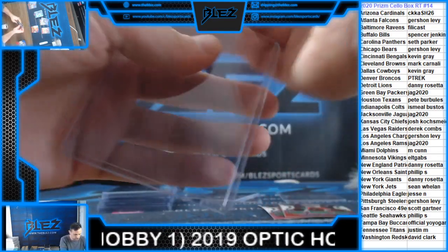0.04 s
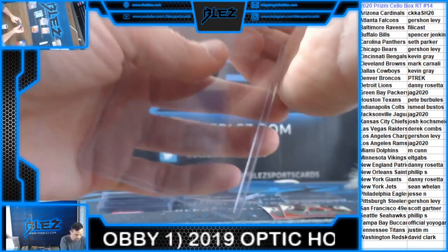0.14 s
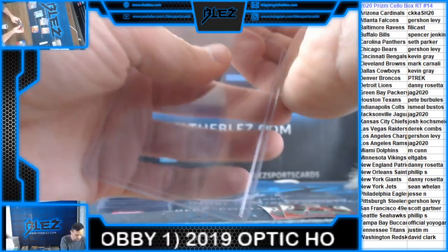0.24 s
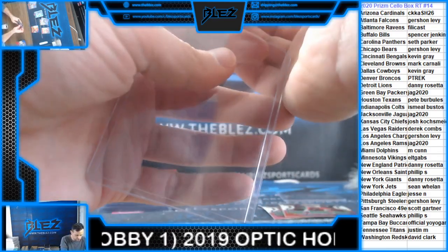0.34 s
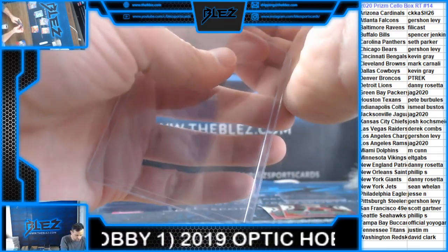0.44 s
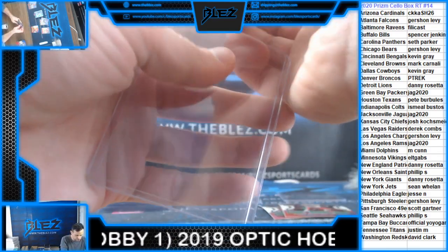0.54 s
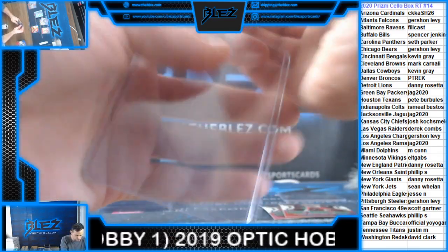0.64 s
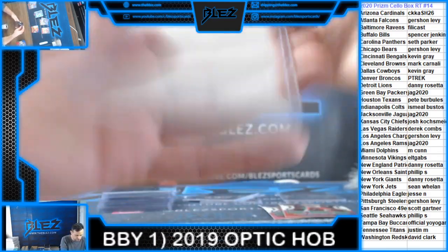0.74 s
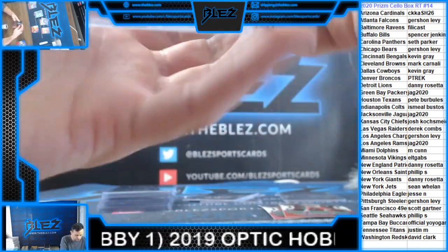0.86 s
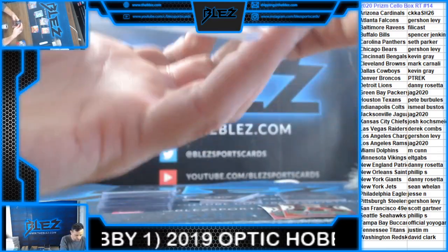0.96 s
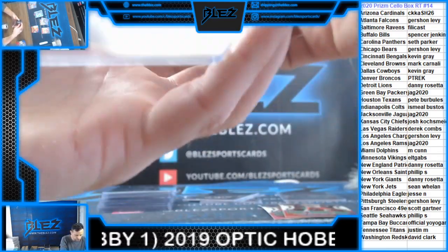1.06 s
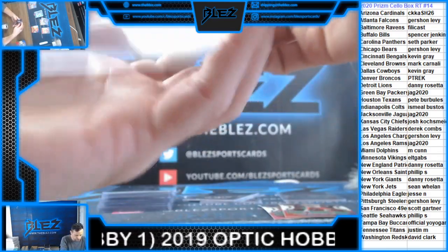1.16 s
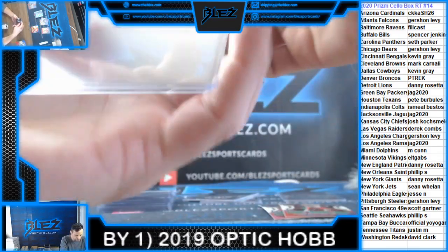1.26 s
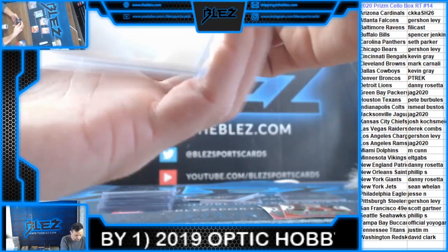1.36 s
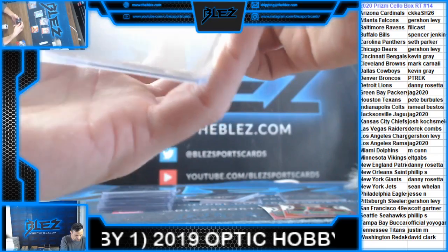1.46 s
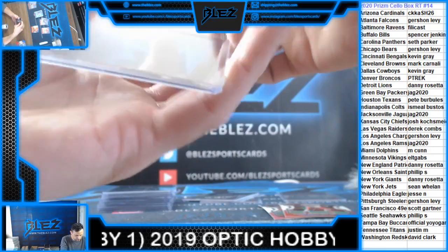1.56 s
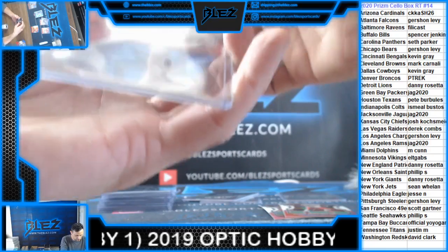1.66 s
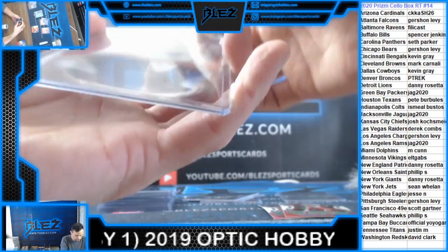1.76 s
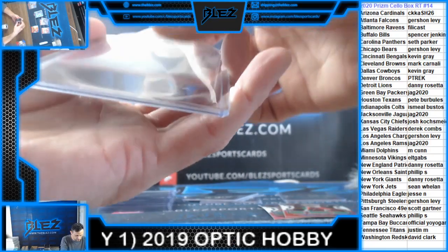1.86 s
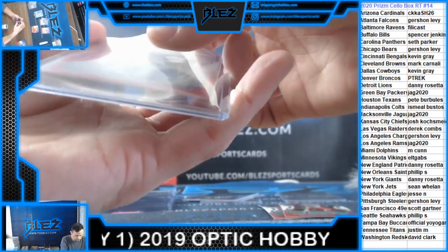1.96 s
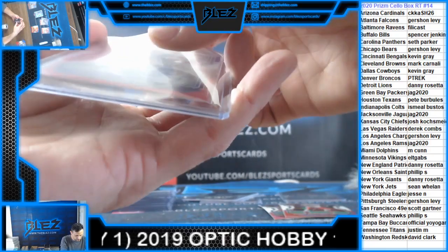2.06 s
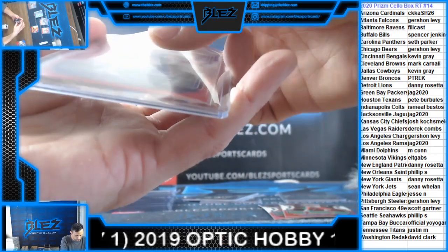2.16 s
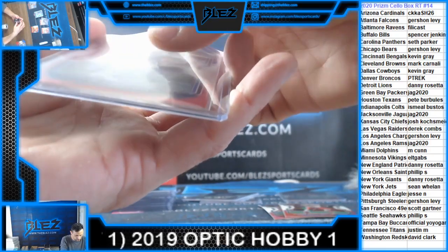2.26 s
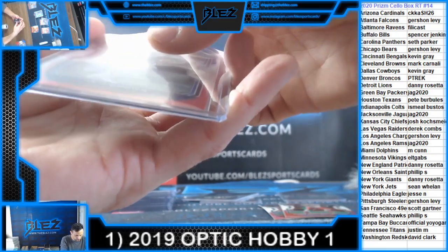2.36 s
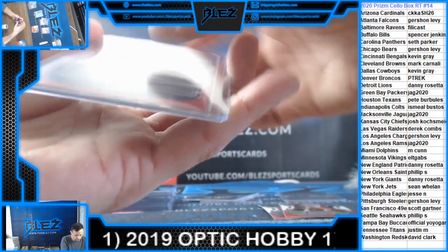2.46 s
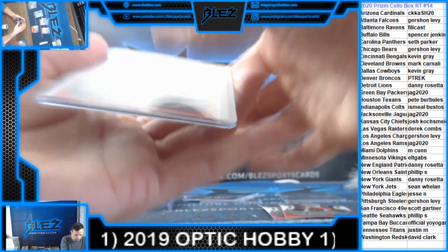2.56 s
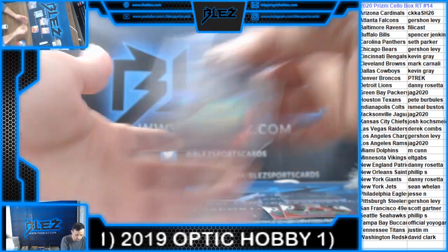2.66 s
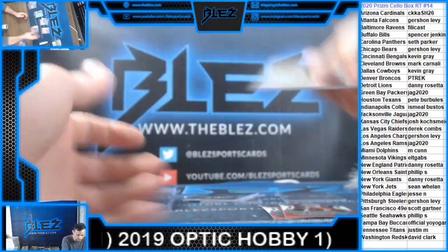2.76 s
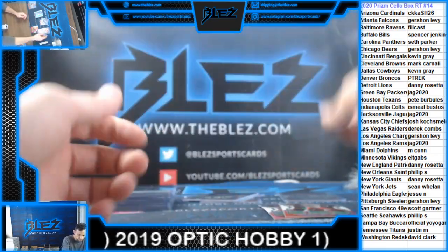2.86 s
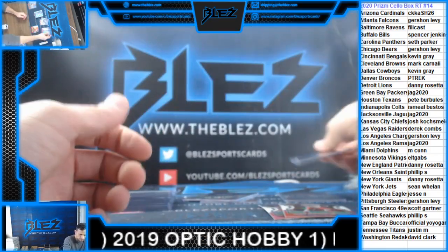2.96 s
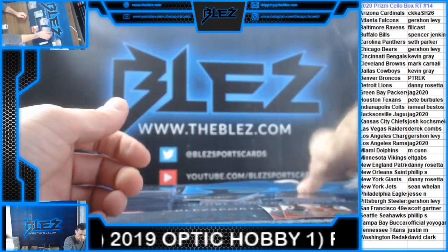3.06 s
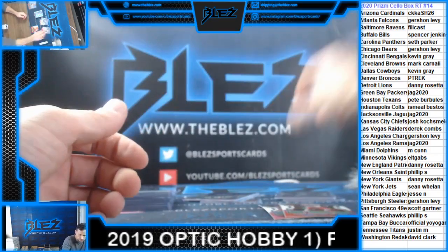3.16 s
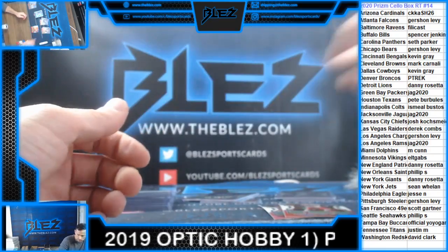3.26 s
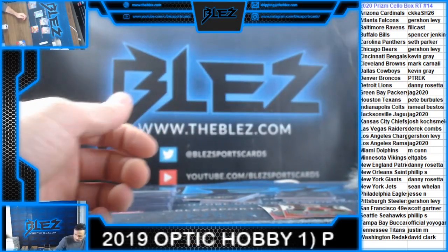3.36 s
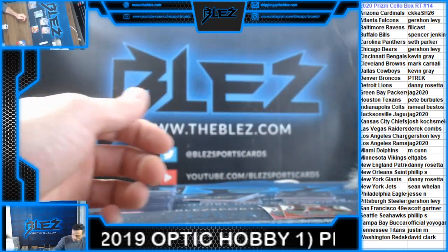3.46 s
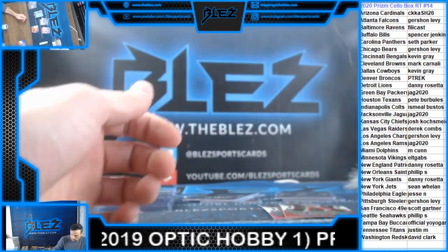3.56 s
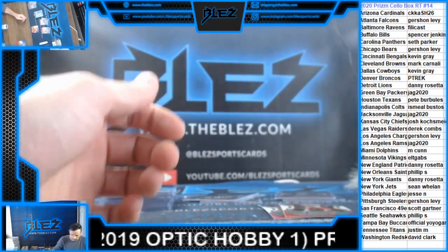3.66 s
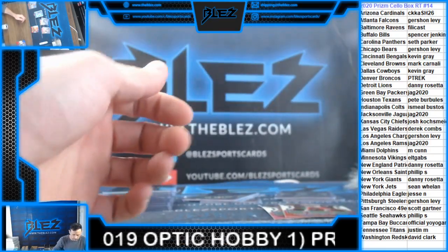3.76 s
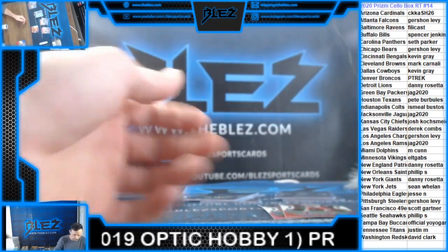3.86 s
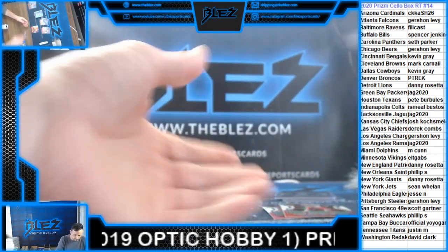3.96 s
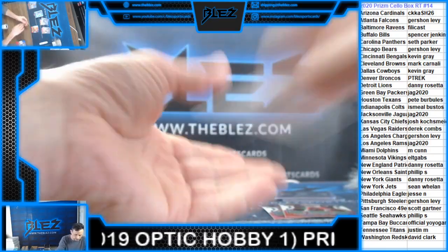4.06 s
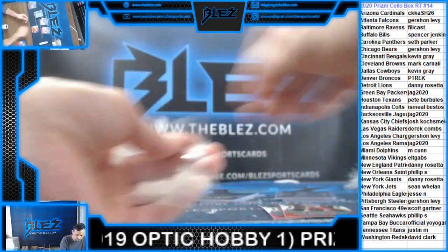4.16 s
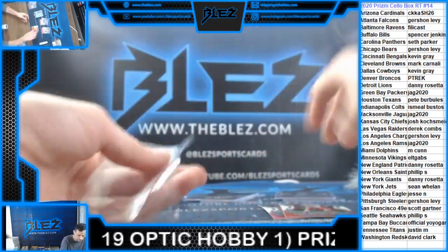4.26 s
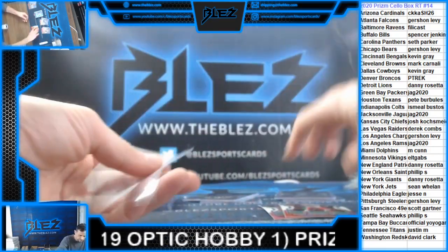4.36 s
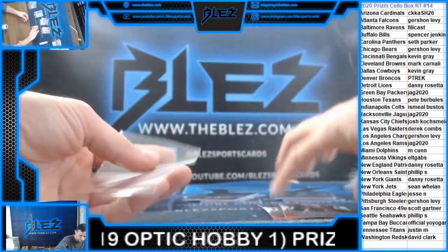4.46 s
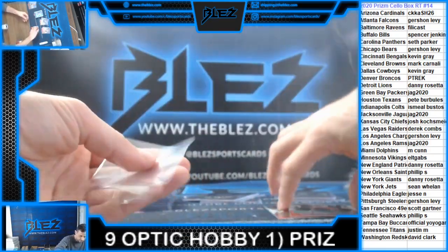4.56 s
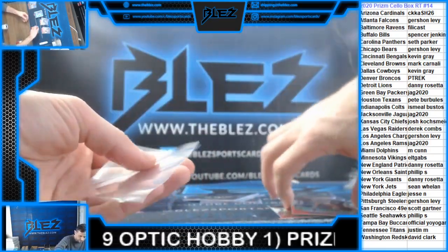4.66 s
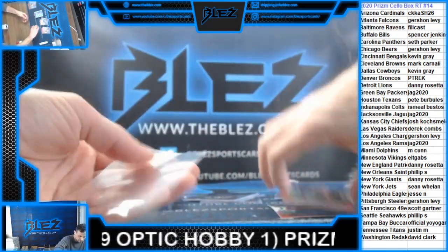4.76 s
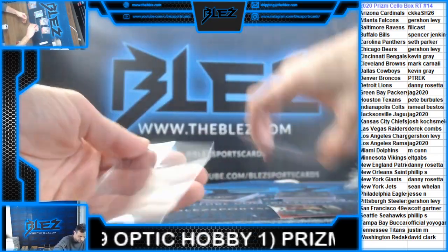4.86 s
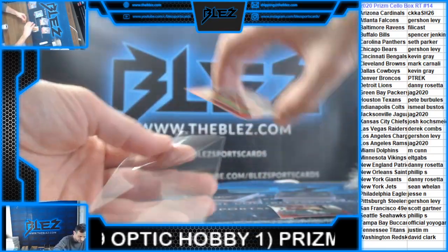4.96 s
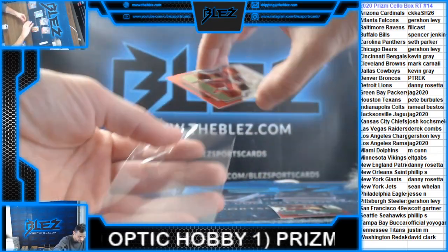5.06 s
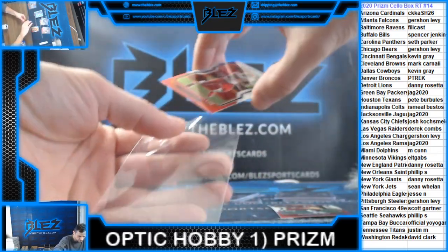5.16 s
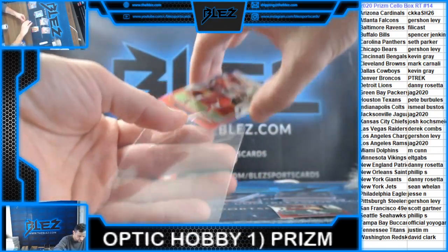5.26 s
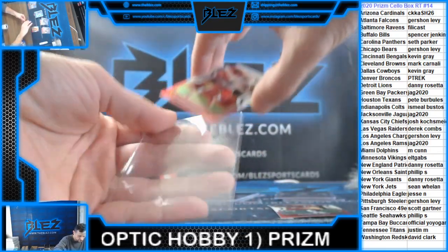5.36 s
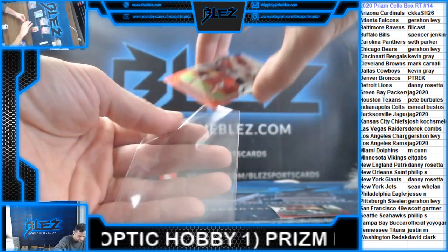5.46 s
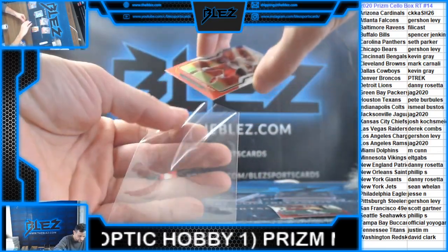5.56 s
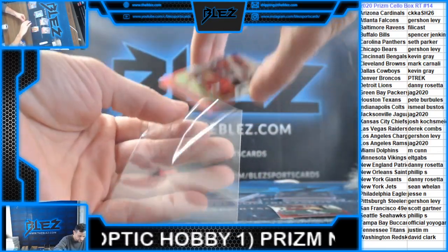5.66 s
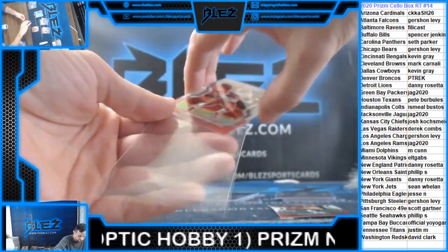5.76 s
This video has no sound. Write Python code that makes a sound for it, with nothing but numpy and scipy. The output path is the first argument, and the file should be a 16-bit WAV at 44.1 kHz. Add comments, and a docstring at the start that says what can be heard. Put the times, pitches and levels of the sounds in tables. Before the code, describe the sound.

Close to a desk microphone, fingers handle a trading card in thin plastic, making light clicks and faint rustles. The card slips into a rigid holder in short, quiet scrapes. After a soft bump, the holder is set down with a sharp clack, by far the loudest sound. More sleeve snaps, low bumps and a light knock follow, while a fan hums faintly in the small room.

```python
"""A small room, at a desk microphone: trading cards are handled over the faint hum of a fan.
Thin sleeves rustle by stick-slip friction and snap by buckling. Knocks excite damped modes of table and
card, and bumps set the table and the microphone stand swaying. A card scrapes into a stiff plastic
holder, which is put down with a loud clack, a run of impacts that ring holder and table.
The room answers with early reflections and a diffuse tail."""
import sys
import numpy as np
from scipy import signal
from scipy.fft import rfft, irfft, next_fast_len
from scipy.io import wavfile
from scipy.ndimage import map_coordinates

SR = 44100
rng = np.random.default_rng(int(sys.argv[2]) if len(sys.argv) > 2 else 0)


def dump(signal):
    """Clip the signal to [-1, 1] and save it as 16-bit WAV at the path in sys.argv[1]."""
    limited = np.clip(np.atleast_2d(signal).T, -1, 1)
    pcm = np.round(limited * 32767).astype(np.int16)
    wavfile.write(sys.argv[1], SR, pcm)


N = 256220


def amp(db):
    """Decibels to amplitude ratio."""
    return 10 ** (np.asarray(db) / 20)


def unit(x):
    """Normalisation to rms 1."""
    return x / np.sqrt(np.mean(x ** 2) + 1e-20)


def along(points, hz):
    """Interpolation of (frequency_hz, value) points on a log frequency axis."""
    f, v = np.transpose(points)
    return np.interp(np.log(hz + 1), np.log(f + 1), v)


def wobble(knots_per_s):
    """Smooth random modulation: a spline through Gaussian knots."""
    knots = rng.standard_normal(int(N * knots_per_s / SR) + 4)
    return map_coordinates(knots, [np.arange(N) * knots_per_s / SR])


def filtered(x, response):
    """Linear filtering: the spectrum times a frequency response."""
    n = x.shape[-1]
    m = 2 * next_fast_len(n // 2 + 4096)
    return irfft(rfft(x, m) * response(np.fft.rfftfreq(m, 1 / SR)), m)[..., :n]


def causal(gain):
    """Minimum-phase response with this gain: nothing sounds before a blow."""
    cepstrum = irfft(np.log(np.maximum(gain, 1e-6)))
    half = len(cepstrum) // 2
    return np.exp(rfft(np.r_[cepstrum[0], 2 * cepstrum[1:half], np.zeros(half)]))


def resonances(modes, f):
    """Modal superposition: the summed response of damped resonators."""
    return sum(amp(db) * 1j * f * width / (hz * hz - f * f + 1j * f * width) for hz, width, db in modes)


def add(track, start_s, sound):
    """Superposition of a sound on a track."""
    part = track[..., round(start_s * SR):][..., :sound.shape[-1]]
    part += sound[..., :part.shape[-1]]


def contact(t60_s, response, grit):
    """Impact: an impulse and dying micro-slips excite a response; the energy is 1 ms of full scale."""
    t = np.arange(SR // 10) / SR
    slips = rng.standard_normal(len(t)) * amp(-60 * t / t60_s)
    blow = filtered((t == 0) + grit * slips / np.linalg.norm(slips), response)
    return blow / np.linalg.norm(blow) * np.sqrt(SR / 1000)


def stereo_pair(noises, coherence):
    """Mid-side mixing gives two independent noises a set left-right coherence."""
    angle = lambda hz: np.arccos(np.clip(along(coherence, hz), -1, 1)) / 2
    mid, side = filtered(noises, lambda hz: np.array([np.cos(angle(hz)), np.sin(angle(hz))]))
    return np.array([mid + side, mid - side])


# Reverberation times of the main and the late tail: frequency_hz, t60_s
MAIN_DECAY = [(100, 0.55), (400, .24), (1300, 0.29), (4000, 0.35), (6000, 0.32), (9000, 0.22),
              (14000, 0.21)]
LATE_DECAY = [(100, .4), (500, 0.48), (1300, .9), (4200, .72), (5800, 0.43), (14000, 0.17)]
# Left-right likeness of the reflections: frequency_hz, coherence
ROOM_COHERENCE = [(100, .65), (300, 0.22), (600, 0.38), (1400, 0.82), (4000, 0.088), (9000, 0.56),
                  (15000, 0.48)]
def room(x, left_db, wall_db, tail_db, late_db=-15, wall_s=0.009, wall_t60_s=0.048, build_s=0.0051):
    """Reverberation: direct sound from the left, early reflections, then a double-slope diffuse tail."""
    t = np.arange(SR * 3 // 4) / SR
    hz, frame_s, spectra = signal.stft(rng.standard_normal((2, len(t))), SR, nperseg=256)
    decay = lambda t60s: 1000 ** (-frame_s / along(t60s, hz)[:, None])
    spectra = spectra * np.hypot(decay(MAIN_DECAY), amp(late_db) * decay(LATE_DECAY))
    tail = signal.istft(spectra, SR, nperseg=256)[1][:, :len(t)]
    tail *= 1 - np.exp(-(t / build_s) ** 2)
    walls = rng.standard_normal((2, len(t))) * (t > wall_s) * amp(-60 * np.abs(t - wall_s) / wall_t60_s)
    reflections = amp(tail_db) * unit(tail) + amp(wall_db) * unit(walls)
    impulse_response = stereo_pair(reflections, ROOM_COHERENCE) / np.sqrt(len(t))
    # the far capsule is shaded in the treble and hears the source a sample later
    shade_db = lambda f: along([(1200, 0.92), (4000, left_db)], f) / 2
    left, right = filtered(x, lambda f: amp([shade_db(f), -shade_db(f)]))
    direct = np.array([left, np.roll(right, 1)])
    return direct + signal.fftconvolve(x[None], impulse_response, axes=1)[:, :len(x)]


# Spectral density of the ventilation noise: frequency_hz, relative_db
AIR_SPECTRUM = [(12, -19.5), (20, 0), (29, 3), (45, -6.5), (66, -6), (96, -9), (130, -10), (240, -13.5),
                (490, -25), (720, -29.5), (900, -33.5), (1600, -36), (4000, -44), (16000, -48.5)]
# Its left-right likeness: frequency_hz, coherence
AIR_COHERENCE = [(25, 0.067), (70, 0.28), (300, 0.62), (1400, 0.26), (3500, .2), (7000, 0.24), (15000, 1)]
# Hum lines of the fan: pitch_hz, level_db
FAN_TONES = [(69, -60.5), (119, -64), (149, -64.5), (199, -72.5), (240, -77), (733.5, -75), (1466, -93)]
def fan(air_db=-52, waver_db=1.5, drift_rad=0.95):
    """Broadband rumble plus tones under slight random amplitude and phase modulation."""
    t = np.arange(N) / SR
    noise = stereo_pair(rng.standard_normal((2, N)), AIR_COHERENCE)
    out = amp(air_db) * unit(filtered(noise, lambda f: amp(along(AIR_SPECTRUM, f))))
    for hz, db in FAN_TONES:
        peak = np.sqrt(2) * amp(db + waver_db * wobble(6.5))
        out += peak * np.sin(2 * np.pi * hz * t + drift_rad * wobble(2.1))
    return out


def stroke(peak_s, length_s, rise_share=0.96, fall_share=1.14):
    """Sliding speed of one hand stroke: a Gaussian swell and a slower fade."""
    t = np.arange(N) / SR - peak_s
    width_s = length_s * np.where(t < 0, rise_share, fall_share)
    return np.exp(-np.minimum(np.abs(t) / width_s, 10) ** 2)


def friction(grains_per_s, grain_share):
    """Stick-slip friction: sparse grains in smooth rubbing noise, under varying pressure."""
    grains = (rng.random(N) < grains_per_s / SR) * rng.standard_normal(N)
    pressure = amp(2 * wobble(90))
    smooth = rng.standard_normal(N)
    return (np.sqrt(grain_share) * unit(grains) + np.sqrt(1 - grain_share) * smooth) * pressure


def scrape(slips, modes, pitch_hz):
    """Forced vibration: slips ring a rubbed sheet at a pitch set by the grip."""
    sheet = [(pitch_hz * ratio, pitch_hz * width, db) for ratio, width, db in modes]
    return unit(filtered(slips, lambda f: resonances(sheet, f)))


# Spectrum of sliding film: frequency_hz, relative_db
HISS_SPECTRUM = [(500, -20), (2500, -7), (4200, -1), (6000, -2.5), (8000, 5), (11000, -3), (15500, -8)]
def hiss(grains_per_s, grain_share):
    """Friction noise of film on film: dense grains hiss, sparse ones crinkle."""
    slips = friction(grains_per_s, grain_share)
    return unit(filtered(slips, lambda f: causal(amp(along(HISS_SPECTRUM, f)))))


# Modes of a rubbed sleeve: pitch_ratio, width_ratio, gain_db
SLEEVE_MODES = [(0.998, 0.34, 8), (1.7, .45, -7.5)]
def sleeve(pitch_hz, scrape_db=-1, crinkle_db=-5):
    """Friction on a thin sheet gives hiss, crinkle and a resonant scrape."""
    film = hiss(650, grain_share=0.34) + amp(crinkle_db) * hiss(110, grain_share=0.99)
    return film + amp(scrape_db) * scrape(friction(1300, grain_share=0.31), SLEEVE_MODES, pitch_hz)


# Fingers brushing a sleeve: peak_s, length_s, relative_db, pitch_hz
BRUSHES = [(0.548, 0.042, -74, 4800), (0.717, 0.043, -70, 1800), (.82, 0.074, -70, 8000),
           (0.986, 0.042, -74, 5500), (3.505, 0.081, -72, 2510), (3.612, 0.021, -65, 2640),
           (4.049, 0.02, -55.5, 2540), (4.106, 0.043, -63, 1187), (4.175, 0.013, -60.5, 2600),
           (4.32, 0.022, -73, 4520), (4.469, 0.055, -67, 2184), (5.205, 0.044, -69.5, 3540),
           (5.665, 0.038, -66.5, 2980), (5.778, 0.041, -66.5, 2980)]
def rustles(gain_db=-3):
    """Friction noise follows the sliding speed of the fingers."""
    out = sum(amp(db + gain_db) * stroke(s, length_s) * sleeve(hz) for s, length_s, db, hz in BRUSHES)
    return room(out, left_db=2.5, wall_db=-9.5, tail_db=-7)


# Spectrum of a snap: frequency_hz, relative_db
SNAP_SPECTRUM = [(300, -13.5), (1000, -5), (2500, -2), (5000, -6), (8000, -1), (11000, 0), (15500, -3)]
# Modes of the bent film: pitch_hz, width_hz, gain_db
FILM_MODES = [(2600, 300, -4), (5300, 700, 2.5), (7400, 1200, -3.5)]
# Sleeves snapping in the fingers: start_s, relative_db, body_db, top_db
BUCKLES = [(0.5819, -28, -21.5, -11), (0.69, -46.5, 5.5, -2), (1.1111, -48, 4, -13), (1.61, -46, 5, -10),
           (1.6681, -48.5, 11, 3), (1.9167, -51, -9, -13), (1.9686, -49.5, 5, -16), (2.6325, -38, -4, -12),
           (3.576, -43.5, -3, -7.5), (3.6876, -48, -5, -6.5), (4.0154, -36.5, 0.5, -9),
           (4.1562, -43.5, 8, -24), (4.23, -30.5, -5, -17), (4.306, -44, -7.5, -12), (4.851, -42.5, 4, -9),
           (4.8598, -37, -1, 0), (4.986, -43.5, 7, -3), (5.0035, -28.5, -2, -2), (5.3479, -47.5, -3, -2),
           (5.3701, -43.5, 1, -6.5)]
def snaps(gain_db=-2.5, firm_db=-30, firm_t60_s=0.017, creak_db=-15, settle_db=-32):
    """Buckling: film creaks, snaps, then settles with a rustle; lighter touches decay more slowly."""
    out, settling = np.zeros((2, N))
    for s, db, body_db, top_db in BUCKLES:
        tilt = [(1700, body_db), (4500, 0), (6800, 0), (11000, top_db + 1)]
        spectrum = lambda f: causal(amp(along(SNAP_SPECTRUM, f) + along(tilt, f)))
        colour = lambda f: spectrum(f) * (2 + resonances(FILM_MODES, f))
        softness = amp(0.5 * (firm_db - db))
        strength = amp(db + gain_db)
        creak = contact(0.02, colour, grit=7.4)[::-1]  # reversed, so it swells into the snap
        add(out, s - len(creak) / SR, strength * amp(creak_db) * creak)
        add(out, s, strength * contact(firm_t60_s * softness, colour, grit=1.5))
        settling += amp(db + settle_db) * stroke(s + 0.028, length_s=0.04)
    ticks = room(out, left_db=12, wall_db=-1.5, tail_db=-1, wall_s=0.0085, wall_t60_s=0.019)
    return ticks + room(settling * sleeve(pitch_hz=4800), left_db=2.5, wall_db=-9.5, tail_db=-7)


# Modes of a card struck on its edge: pitch_hz, width_hz, gain_db
CARD_MODES = [(1923, 32, -2), (2520, 56, 1), (2874, 77, -7.5), (5100, 25, 2)]
# Fingers and cards striking the table: start_s, relative_db, pitch_hz, edge_db
TABLE_KNOCKS = [(1.112, -54.5, 510, -2.5), (1.556, -49, 570, -24), (2.621, -32.5, 300, -30),
                (2.626, -33, 170, -32), (2.633, -35, 390, -23), (4.018, -48, 770, 3),
                (4.231, -51.5, 600, 12), (5.004, -32.5, 520, -2), (5.368, -61, 599, 5)]
def knocks(thud_db=-1, width_hz=270, soft_hz=500):
    """A soft impact acts as a low-pass on one broad resonance; a card edge adds its own modes."""
    out = np.zeros(N)
    for s, db, hz, edge_db in TABLE_KNOCKS:
        thud = lambda f: resonances([(hz, width_hz, 0)], f) ** 2 / (1 + 1j * f / soft_hz)
        add(out, s, amp(db + thud_db) * contact(0.0035, thud, grit=0.46))
        add(out, s, amp(db + edge_db) * contact(0.002, lambda f: resonances(CARD_MODES, f), grit=0.17))
    return room(out, left_db=5.5, wall_db=-16.5, tail_db=-7)


# Bumps that shake the furniture: start_s, sway_db, boom_db
FURNITURE_BUMPS = [(1.242, -42.5, -74), (1.742, -42, -59), (2.619, -41.5, -38.5), (2.81, -32.5, -42.5),
                   (2.992, -34, -22), (3.088, -56.5, -29), (3.51, -40, -34), (4.067, -27.5, -36),
                   (4.252, -29, -48)]
def furniture():
    """Damped free vibration: after a bump the microphone stand sways and the table top booms."""
    t = np.arange(SR * 3 // 2) / SR
    def swing(hz, t60_s, rise_s):
        return np.sin(2 * np.pi * hz * t) * 1000 ** (-t / t60_s) * (1 - np.exp(-t / rise_s))
    sway = swing(hz=28.06, t60_s=1.2, rise_s=0.03)
    boom = swing(hz=64.4, t60_s=0.41, rise_s=0.035)
    stand, table = np.zeros((2, N))
    for s, sway_db, boom_db in FURNITURE_BUMPS:
        add(stand, s, amp(sway_db) * sway)
        add(table, s, amp(boom_db) * boom)
    # the rocking stand moves the two capsules about a quarter cycle apart
    lagging = np.roll(stand, round(0.01 * SR))
    return np.array([amp(-1) * stand + table, amp(4) * lagging + amp(-3.5) * table])


# Modes of the holder's scraped wall: pitch_ratio, width_ratio, gain_db
WALL_MODES = [(1, .12, 5.5), (1.55, 0.2, -5), (.65, 0.31, -9)]
# The card edge slipping into the holder: peak_s, length_s, relative_db, pitch_hz
PUSHES = [(1.563, 0.0091, -57, 1850), (1.619, 0.0051, -51.5, 1620), (1.679, 0.032, -61, 1720),
          (1.751, 0.024, -55.5, 1730), (1.801, 0.083, -61.5, 1720), (2.385, 0.014, -55, 1957),
          (2.561, 0.013, -56, 2113), (2.589, 0.026, -55.5, 2300)]
def slides(gain_db=-3, hiss_db=-8, crinkle_db=-12):
    """Stick-slip excitation: each push of the card rings the holder's wall over hiss and crinkles."""
    slips = friction(1300, grain_share=0.4)
    film = amp(hiss_db) * hiss(650, grain_share=0.34) + amp(crinkle_db) * hiss(50, grain_share=0.96)
    out = np.zeros(N)
    for s, length_s, db, hz in PUSHES:
        out += amp(db + gain_db) * stroke(s, length_s) * (scrape(slips, WALL_MODES, hz) + film)
    return room(out, left_db=9, wall_db=-3.5, tail_db=-4.5)


# Modes of the holder on the table: pitch_hz, width_hz, gain_db
HOLDER_MODES = [(340, 180, -3), (640, 320, 1.5), (950, 230, -1.5), (1290, 270, -5), (1720, 230, -6.5),
                (2450, 290, -9), (3300, 490, 0), (3680, 230, -5), (4346, 150, -12), (6600, 700, -7.5),
                (7940, 310, -4.5)]
COUPLED_MODES = [(182, 17, 6.5), (362, 27, 10), (560, 60, -6), (660, 45, 5), (794, 14, -3.5),
                 (885, 22, -7.5), (1353, 71, 5), (1459, 9.8, 3), (1500, 60, -3.5), (1720, 60, 3.5),
                 (2530, 20, 5), (8040, 34, -5.5)]  # holder and table ringing together
ANTIPHASE_MODES = [(300, 45, 3), (770, 90, -1)]  # table modes that reach the capsules in opposite phase
# Spectrum of the hard contact: frequency_hz, relative_db
CRACK_SPECTRUM = [(100, -11.5), (450, -1.5), (1500, 4.5), (4200, 1.5), (5800, -4.5), (8200, 4),
                  (10500, -17), (13000, -20), (15000, -8)]
# The holder lands on an edge, slaps flat and rattles: start_s, relative_db, body_db, t60_s
HOLDER_IMPACTS = [(2.972, -17.5, -11.5, 0.022), (2.9734, -11, -3, 0.02), (2.9831, -16.5, 6.5, 0.014),
                  (2.986, -6, -1, 0.011), (2.9887, -7.5, 5.5, 0.026), (2.9944, -14, 3, 0.014),
                  (2.998, -12.5, -4, 0.028)]
def clack(gain_db=-3, ring_db=2, crack_db=-4, slap_s=2.9886, slap_db=-8, twist_db=-18):
    """Impact excitation: each contact cracks and rings the holder; the flat slap also rings the table."""
    out = np.zeros((2, N))
    tail_pad = (0, SR * 3 // 4)
    ring = lambda f: amp(ring_db) * np.abs(resonances(HOLDER_MODES, f))
    crack = lambda f: amp(crack_db + along(CRACK_SPECTRUM, f))
    for s, db, body_db, t60_s in HOLDER_IMPACTS:
        tilt = [(1700, body_db), (4000, 0.0054)]  # each spot struck has its own weight of body
        colour = lambda f: causal(np.hypot(ring(f), crack(f)) * amp(along(tilt, f)))
        blow = np.pad(contact(t60_s, colour, grit=2.5), tail_pad)
        add(out, s, amp(db + gain_db) * room(blow, left_db=9, wall_db=-8.5, tail_db=-2.5))
    thump = np.pad(contact(0.002, lambda f: resonances(COUPLED_MODES, f), grit=0.054), tail_pad)
    add(out, slap_s, amp(slap_db) * room(thump, left_db=4, wall_db=-13.5, tail_db=-11.5))
    twist = contact(0.002, lambda f: resonances(ANTIPHASE_MODES, f), grit=0.1)
    add(out, slap_s, amp(twist_db) * np.array([twist, -twist]))
    return out


def scene():
    """Linear superposition of all sources at the two capsules."""
    return fan() + rustles() + snaps() + knocks() + furniture() + slides() + clack()


def record(dry):
    """Hard clipping at full scale, then a steep low-pass band limit."""
    cutoff_hz = 16100
    return filtered(np.clip(dry, -1, 1), lambda hz: 1 / (1 + (hz / cutoff_hz) ** 120))


dry = scene()
out = record(dry)
dump(out)
```